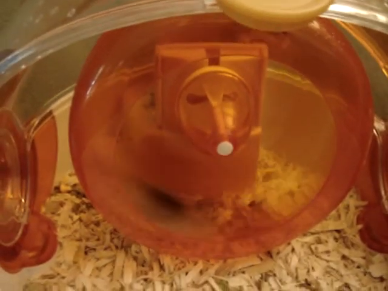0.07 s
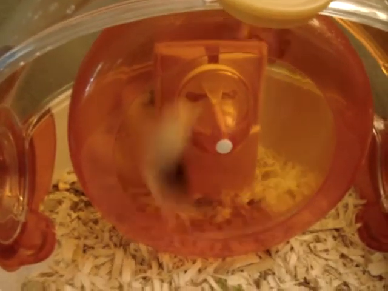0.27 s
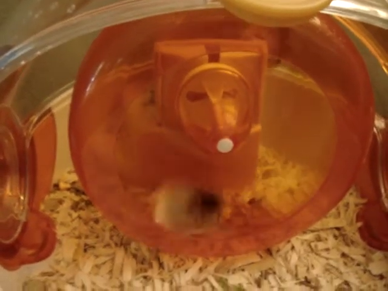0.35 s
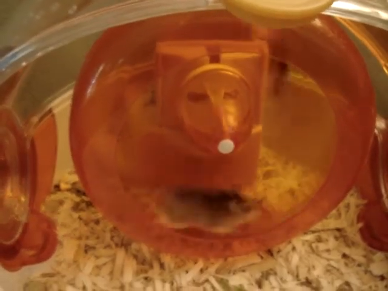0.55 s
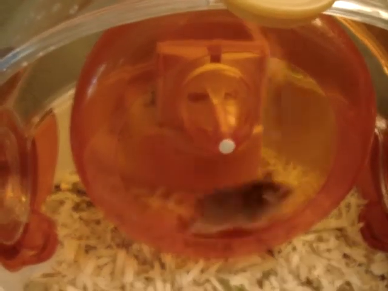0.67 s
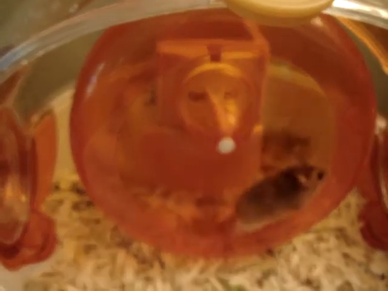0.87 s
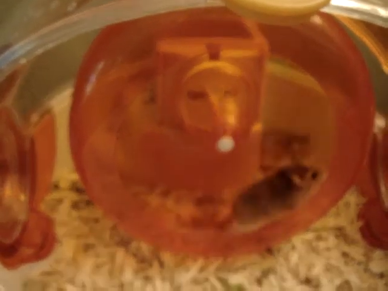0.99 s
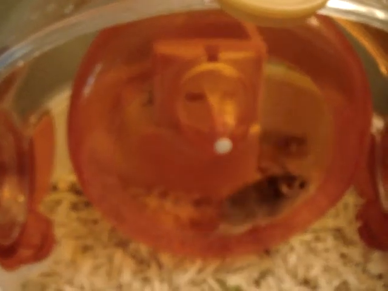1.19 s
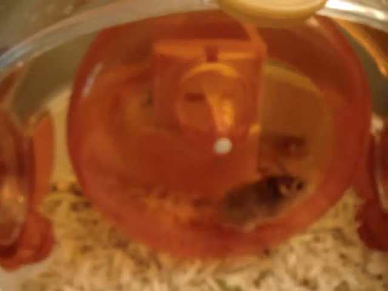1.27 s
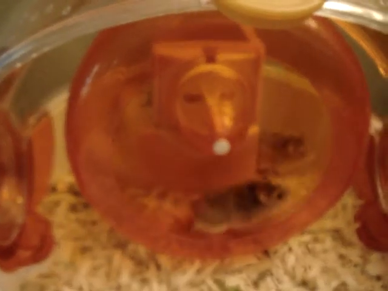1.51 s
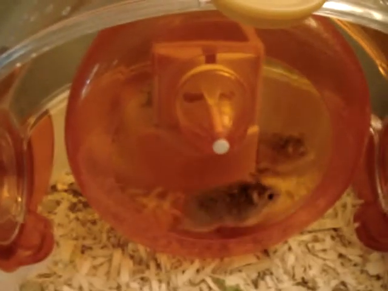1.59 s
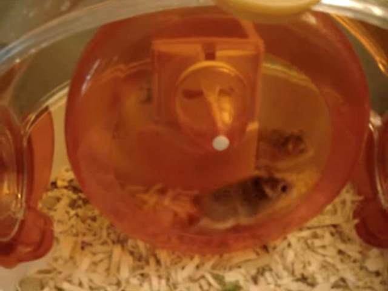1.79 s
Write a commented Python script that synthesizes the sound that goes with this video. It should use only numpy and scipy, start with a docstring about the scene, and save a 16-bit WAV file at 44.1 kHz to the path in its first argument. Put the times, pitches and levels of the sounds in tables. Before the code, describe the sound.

Light paw thumps and claw scratches come from a hamster running in a plastic wheel inside a cage. After one sharp knock from the wheel, the animal shuffles quietly while a thin squeak comes and goes in a humming room.

```python
"""A hamster runs in a rumbling plastic wheel inside a cage, its claws ticking and scratching on the shell.
Its paws pat and its weight thumps the wheel. Then it stops, and the wheel knocks once as it swings back.
After that it shuffles about, while a thin squeak that began just before the knock comes and goes.
All along, wood shavings rustle on and off and the room hums and hisses. The sound is mono."""
import sys
import numpy as np
from scipy import signal
from scipy.fft import rfft, irfft
from scipy.io import wavfile

SR = 44100
rng = np.random.default_rng(int(sys.argv[2]) if len(sys.argv) > 2 else 0)


def file_out(sig):
    """Save sig as 16-bit WAV at sys.argv[1]."""
    # one column per channel
    cols = np.atleast_2d(sig).T
    # limit, then scale
    lim = np.clip(cols, -1, 1)
    pcm = np.round(lim * 32767).astype(np.int16)
    wavfile.write(sys.argv[1], SR, pcm)


N = 81585


def footfalls():
    """The body lands on the wheel with dull thumps; the paws make light, hollow pats."""
    # landings: (time [s], level [dB], treble limit [Hz], bass limit [Hz], pitch of the spot [ratio])
    landings = [(0.3868, -36, 513, 216, 1), (0.4225, -37, 1100, 202, 1), (0.4376, -35, 1310, 70, 0.92),
                (0.4440, -35.5, 1400, 67, 1.08), (0.4578, -29, 726, 103, 1.01), (0.4638, -30, 1300, 232, 1),
                (0.503, -32.5, 352, 100, 1.02), (0.576, -38.5, 790, 336, .94), (0.678, -54, 785, 313, 1),
                (0.694, -36, 550, 353, 0.96)]
    # notes of the wheel and its mount: (pitch [Hz], level [dB], ring time [s])
    thump_notes = [(119, -8.5, 0.19), (313, -10.5, 0.078), (349.4, -4.5, 0.045), (475, -1, 0.046),
                   (650, -15, 0.03), (775, -6.5, 0.071), (875, -7, 0.03), (1042, -12, 0.043),
                   (1350, -13, 0.058), (1780, -24, 0.02), (2360, -16, 0.08)]
    # paw steps: (time [s], level [dB], pitch of the spot [ratio])
    steps = [(0.2, -41.5, 1.08), (0.301, -39, 0.95), (0.3862, -35, 1.01), (0.4985, -44, 1.2),
             (1.587, -47, 1.02)]
    # notes of the shell under a paw: (pitch [Hz], level [dB], ring time [s])
    pat_notes = [(895, -1, 0.035), (1324, -10, 0.07), (1900, -16, 0.12)]
    treble_hz, bass_hz = 2550, 465
    pats = [(time, db, treble_hz, bass_hz, pitch) for time, db, pitch in steps]
    return in_cage(strike(landings, thump_notes) + strike(pats, pat_notes), echo_db=-11)


def wheel_knock():
    """The wheel swings back, touches its mount lightly, then knocks hard on it."""
    # the touch and the knock: (time [s], level [dB])
    contacts = [(0.7436, -35), (0.7503, -19)]
    # notes of the knocked wheel: (pitch [Hz], level [dB], ring time [s])
    notes = [(456, -9, 0.024), (475, -15, 0.051), (642, -15.5, 0.093), (706, -21.5, 0.2), (787, -1, 0.049),
             (801, -15.5, 0.27), (1150, -20, 0.084), (1323, -23, 0.19), (1387, -9, 0.06), (1524, -27, 0.16),
             (1870, -15, 0.04), (2070, -11, 0.02), (2220, -27, 0.028)]
    treble_hz, bass_hz = 2270, 393
    hits = [(time, db, treble_hz, bass_hz, 1) for time, db in contacts]
    return in_cage(strike(hits, notes), echo_db=-16.5)


def wheel_rumble():
    """The hollow shell rumbles as it turns on its axle."""
    # loudness of the turning: (time [s], level [dB])
    loudness = [(0, -51.5), (0.22, -54.5), (0.28, -56), (0.33, -52), (0.38, -52.5), (0.46, -45),
                (0.53, -50), (0.61, -56.5), (0.68, -50), (0.728, -63), (0.745, -42.5), (0.82, -51),
                (0.95, -58.5), (1.85, -56.5)]
    # tone of the shell: (frequency [Hz], level [dB])
    tone = [(30, -28), (60, -12), (115, -17), (170, -4.5), (300, -15), (480, 3.5), (650, -6.5), (850, 4.5),
            (1080, -5), (1350, 2), (1900, -5), (3000, -7.5), (6000, -17.5)]
    return level(loudness) * colour(clicks(per_s=2500, spread_db=3.0), tone)


def claw_taps():
    """Hard claw tips make the plastic ring, high and short."""
    # taps: (time [s], level [dB], pitch of the spot [ratio])
    taps = [(0.0851, -44.5, 1.1), (0.1183, -48, 1.15), (0.2218, -42.5, 1.17), (0.3852, -37.5, .97),
            (0.4545, -39, 1), (0.8505, -48, 0.96), (1.0675, -52, 1.42), (1.1215, -49, 1.25),
            (1.5005, -45, 1.32), (1.533, -55, 1.46), (1.5866, -38.5, 1.03), (1.5960, -52, 1.02),
            (1.6165, -53, 1.2)]
    # notes of the shell under a claw: (pitch [Hz], level [dB], ring time [s])
    notes = [(2700, -6.5, 0.049), (2817, 2, 0.037), (3255, -14, 0.018), (3540, -8, 0.031),
             (4220, -8, 0.034), (4830, -13, 0.017), (6250, -15.5, 0.0083), (6500, -20, 0.025)]
    treble_hz, bass_hz = 8950, 2080
    hits = [(time, db, treble_hz, bass_hz, pitch) for time, db, pitch in taps]
    return in_cage(strike(hits, notes), echo_db=-9)


def claw_scratches():
    """Each scratch is a short run of tiny slips that stirs one note of the plastic."""
    # scratches: (time [s], level [dB], length [s], treble tilt [dB per octave], note [Hz])
    scratches = [(0.007, -45.5, 0.0018, 26, 4860), (0.014, -52.5, 0.042, 4, 3150),
                 (0.068, -53, 0.024, 22, 7300), (0.205, -60, 0.0084, -26, 3360),
                 (0.2112, -45.5, 0.002, 8, 8900), (0.216, -45.5, 0.0093, 5.5, 5950),
                 (0.386, -49, 0.0065, 8, 3340), (0.41, -45.5, 0.013, 4, 2830),
                 (0.4416, -43, 0.011, 12, 5900), (0.4541, -37, 0.0011, -5, 5700),
                 (0.478, -51.5, 0.01, 13, 3860), (0.52, -53, .005, 24, 7220), (0.7, -53, 0.025, -7, 4430),
                 (0.736, -41, 0.011, -10, 1430), (0.7367, -47.5, 0.019, 12.5, 3670),
                 (1.0676, -47.5, 0.0077, 12, 9700), (1.121, -46, 0.0021, 20, 3520),
                 (1.49, -55, 0.038, -6, 4600), (1.4981, -42.5, 0.0034, 32, 7600),
                 (1.531, -46.5, 0.0051, 16.5, 4040), (1.561, -47, 0.0032, 18, 5800),
                 (1.5860, -44.5, 0.0035, 7.5, 6090), (1.59, -55, .003, 7, 7760),
                 (1.71, -49, 0.0026, 8, 4430)]
    # tone of a claw on plastic: (frequency [Hz], level [dB])
    tone = [(40, -88), (300, -23), (1200, 3.5), (2200, 9), (3300, 6.5), (4500, 3.5), (6000, 0),
            (8000, -4.5), (10000, -10)]
    rise_s, fade_s, ring_db, ring_width_hz = 0.0004, 0.0031, -8, 350
    t, out = seconds(), 0
    for start, db, length, tilt_db, ring_hz in scratches:
        rise = np.clip((t - start) / rise_s, 0, 1)
        fade = np.exp(-np.maximum(t - start - length, 0) / fade_s)
        slips = colour(clicks(per_s=7600, spread_db=3.5), tone, tilt_db)
        ring_filter = signal.iirpeak(ring_hz, ring_hz / ring_width_hz, fs=SR)
        ring = unit_power(signal.lfilter(*ring_filter, slips))
        out = out + from_db(db) * rise * fade * unit_power(slips + from_db(ring_db) * ring)
    return out


def shavings():
    """Dry wood chips slide and settle in the wheel, in small clumps of fine crackle."""
    # loudness of the sliding: (time [s], level [dB])
    loudness = [(0, -71), (0.14, -54), (0.27, -67), (0.37, -93), (0.46, -72), (0.55, -61), (0.66, -61),
                (0.725, -81), (0.755, -57.5), (0.81, -54.5), (0.89, -75), (1.02, -103), (1.10, -63),
                (1.24, -58), (1.32, -72.5), (1.45, -67), (1.52, -67), (1.85, -61.5)]
    # tone of the chips: (frequency [Hz], level [dB])
    tone = [(50, -42), (300, -7), (1000, -9), (2000, -10.5), (3200, -5.5), (4500, -1), (7500, 2.5),
            (10000, -10.5)]
    crackle = in_cage(clicks(per_s=5700, spread_db=4.0), echo_db=-16.5)
    clumps = from_db(1.2 * drift(rate_hz=40))
    return level(loudness) * clumps * colour(crackle, tone)


def squeaks():
    """Faint, unsteady whistles swell and fade; the rougher ones have more rubbing noise in them."""
    # squeaks: (time [s], length [s], first pitch [Hz], last pitch [Hz], level [dB], roughness [0-1])
    whistles = [(0.561, 0.21, 2720, 2640, -55, 0.1), (0.863, 0.1, 2674, 2695, -54.5, 0.2),
                (0.917, 0.066, 2720, 2683, -51, 0.02), (1.104, 0.058, 2653, 2707, -53, 0.2),
                (1.164, 0.083, 2680, 2730, -50.5, 0.2), (1.279, 0.08, 3380, 3300, -58, 0.3),
                (1.34, 0.22, 2620, 2710, -59, 0.1), (1.47, 0.024, 3570, 3610, -52.5, 0)]
    wobble_hz, rub_width_hz = 6.3, 130
    t, out = seconds(), 0
    for start, length, first_hz, last_hz, db, rough in whistles:
        progress = np.clip((t - start) / length, 0, 1)
        hz = first_hz + (last_hz - first_hz) * progress + wobble_hz * drift(rate_hz=55)
        phase = 2 * np.pi * np.cumsum(hz) / SR
        rub = (drift(rub_width_hz) * np.sin(phase) + drift(rub_width_hz) * np.cos(phase)) / np.sqrt(2)
        squeak = np.sqrt(1 - rough) * np.sin(phase) + np.sqrt(rough) * rub
        out = out + from_db(db) * np.sin(np.pi * progress) * squeak
    return out


def room():
    """The room hisses evenly, and appliances add a few wavering tones."""
    # tone of the hiss: (frequency [Hz], level [dB])
    hiss_tone = [(20, 12.5), (45, -0.5), (80, 1), (130, -2), (200, 1), (330, 3), (600, -1), (850, 0.5),
                 (1400, -5), (2000, -10), (2450, -6.5), (2780, -2), (3100, -8.5), (4500, -11.5),
                 (7700, -12), (10000, -19)]
    # appliance tones: (pitch [Hz], level [dB])
    hums = [(59.5, -68), (119.5, -70.5), (258.0, -60.5), (8001, -84), (8033, -85)]
    hiss_db, waver_db, wander_hz = -51, 1.06, 2.01
    out = from_db(hiss_db) * colour(rng.standard_normal(N), hiss_tone)
    for hz, db in hums:
        phase = 2 * np.pi * np.cumsum(hz + wander_hz * drift(rate_hz=9.2)) / SR
        out = out + np.sqrt(2) * from_db(db + waver_db * drift(rate_hz=6.0)) * np.sin(phase)
    return out


def strike(hits, notes, vary_db=0.7):
    """Each hit rings all the notes in a slightly new mix; a note falls 60 dB in its ring time."""
    out, t = np.zeros(N), np.arange(SR // 2) / SR
    hz, note_db, ring_s = np.transpose(notes)[:, :, None]
    for time, db, treble_hz, bass_hz, pitch in hits:
        rings = np.sin(2 * np.pi * pitch * hz * t) * np.exp(-np.log(1000) * t / ring_s)
        gains = from_db(db + note_db[:, 0] + vary_db * rng.standard_normal(len(notes)))
        # a softer contact has a lower treble limit
        blow = signal.sosfilt(signal.butter(2, treble_hz, fs=SR, output="sos"), gains @ rings)
        blow = signal.sosfilt(signal.butter(4, bass_hz, "high", fs=SR, output="sos"), blow)
        start = int(time * SR)
        out[start:start + len(t)] += blow[:N - start]
    return out


def in_cage(x, echo_db, ring_s=0.42, first_echo_s=0.0019):
    """Add the many short echoes of the cage and the room."""
    t = np.arange(SR // 2) / SR
    tail = rng.standard_normal(len(t)) * np.exp(-np.log(1000) * t / ring_s) * (t > first_echo_s)
    return x + from_db(echo_db) * signal.fftconvolve(x, tail / np.linalg.norm(tail))[:N]


def clicks(per_s, spread_db):
    """Tiny clicks of uneven size at random times."""
    sizes = from_db(spread_db * np.minimum(rng.exponential(1, N), 4))
    return sizes * rng.choice([-1, 1], N) * (rng.random(N) < per_s / SR)


def colour(x, tone, tilt_db=0, top_hz=10050):
    """Shape a sound's bass and treble, tilted by tilt_db per octave; the result has a power of one."""
    hz, db = np.transpose(tone)
    octave = np.log2(np.maximum(np.arange(N // 2 + 1) * SR / N, 1))
    gain = from_db(np.interp(octave, np.log2(hz), db) + tilt_db * octave)
    below_top = octave < np.log2(top_hz) + 0.1
    return unit_power(irfft(rfft(x) * gain * below_top, N))


def drift(rate_hz):
    """A smooth random wander, about one in size; a higher rate makes it quicker."""
    step, warm_up = 40, 2000  # samples per point, points thrown away
    memory = np.exp(-2 * np.pi * rate_hz * step / SR)
    noise = rng.standard_normal(N // step + warm_up + 2)
    slow = signal.lfilter([1], [1, -2 * memory, memory ** 2], noise)[warm_up:]
    return np.interp(np.arange(N) / step, np.arange(len(slow)), unit_power(slow))


def level(curve):
    """Gain over time from (time [s], level [dB]) points."""
    return from_db(np.interp(seconds(), *np.transpose(curve)))


def from_db(db):
    """Turn decibels into a gain to multiply by."""
    return 10 ** (np.asarray(db) / 20)


def unit_power(x):
    """Scale to an average power of one."""
    return x / np.sqrt(np.mean(x ** 2) + 1e-20)


def seconds():
    """Time of every sample."""
    return np.arange(N) / SR


def scene():
    """Everything reaches one microphone, the same in both channels."""
    wheel = footfalls() + wheel_knock() + wheel_rumble()
    claws = claw_taps() + claw_scratches()
    return np.tile(wheel + claws + shavings() + squeaks() + room(), (2, 1))


def record(dry):
    """The small microphone loses the deep bass; the highest treble is cut steeply."""
    bass_hz, top_hz = 141, 10050
    thin = signal.sosfilt(signal.butter(2, bass_hz, "high", fs=SR, output="sos"), dry)
    return signal.sosfilt(signal.ellip(12, 0.1, 70, top_hz, fs=SR, output="sos"), thin)


dry = scene()
out = record(dry)
file_out(out)
```